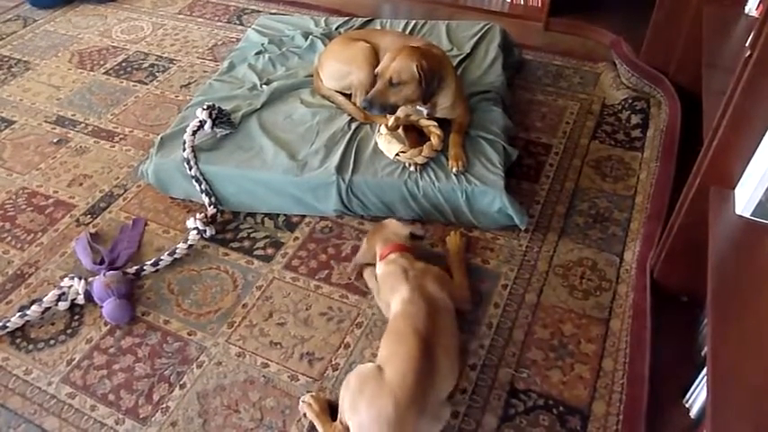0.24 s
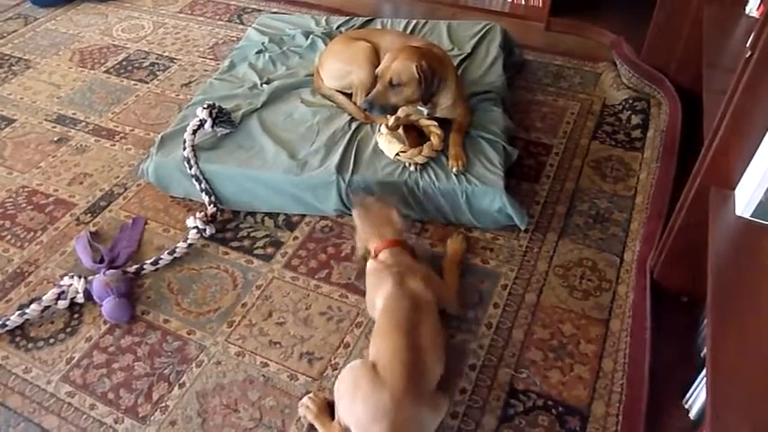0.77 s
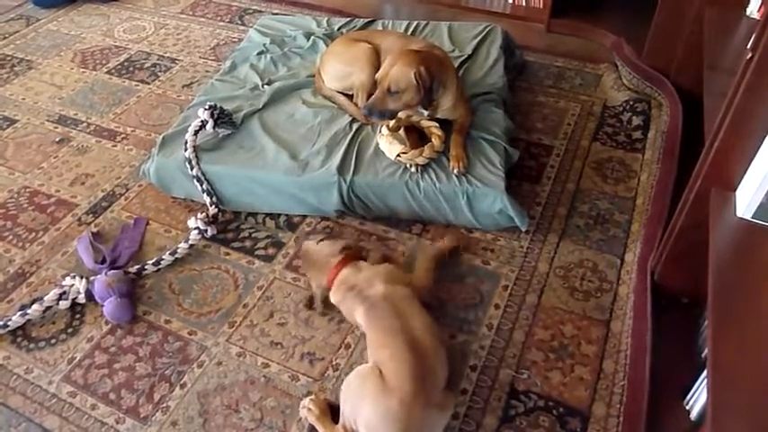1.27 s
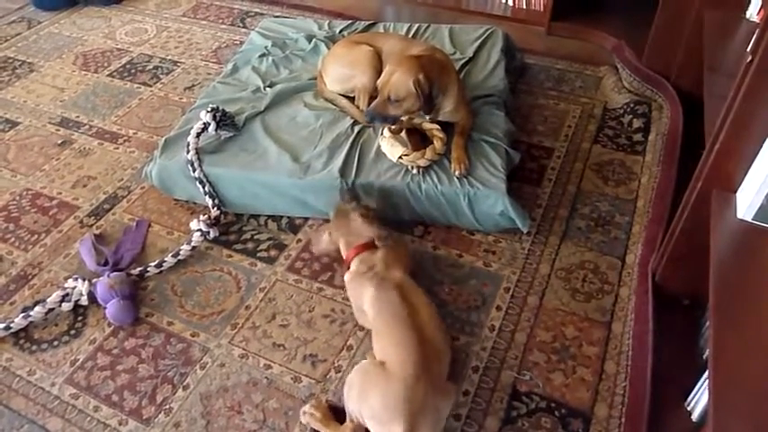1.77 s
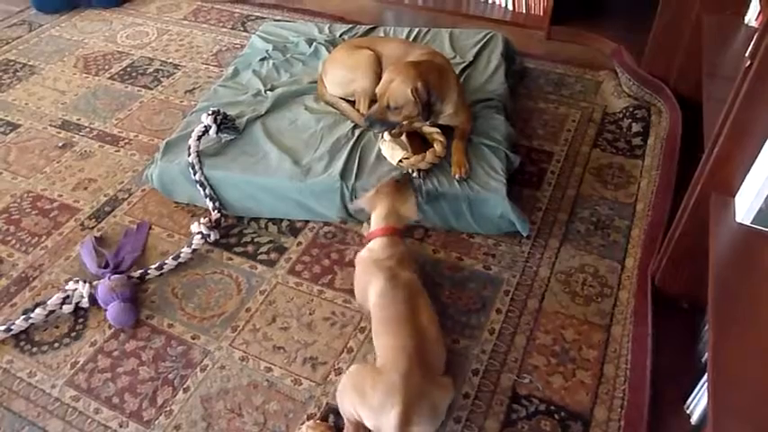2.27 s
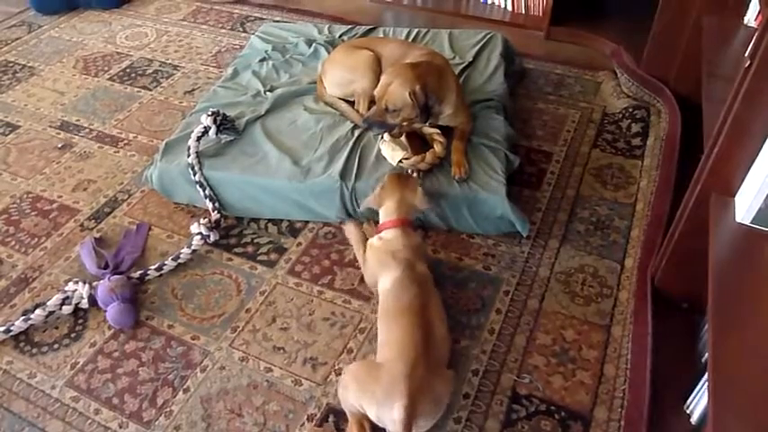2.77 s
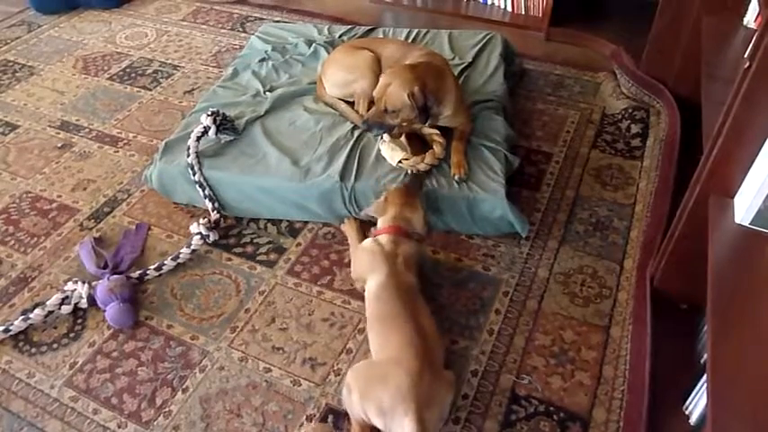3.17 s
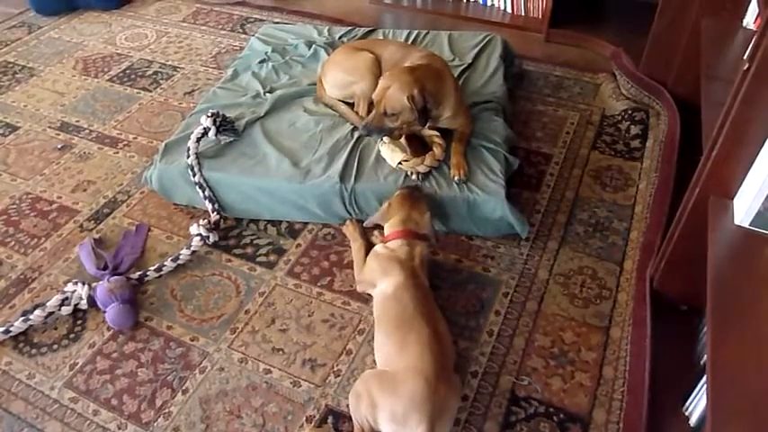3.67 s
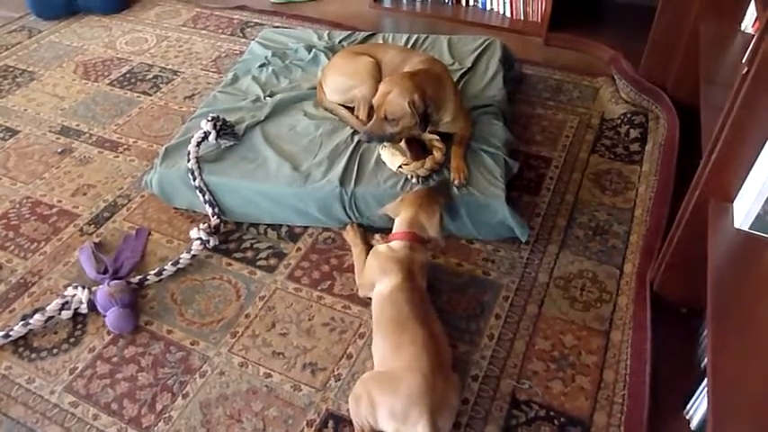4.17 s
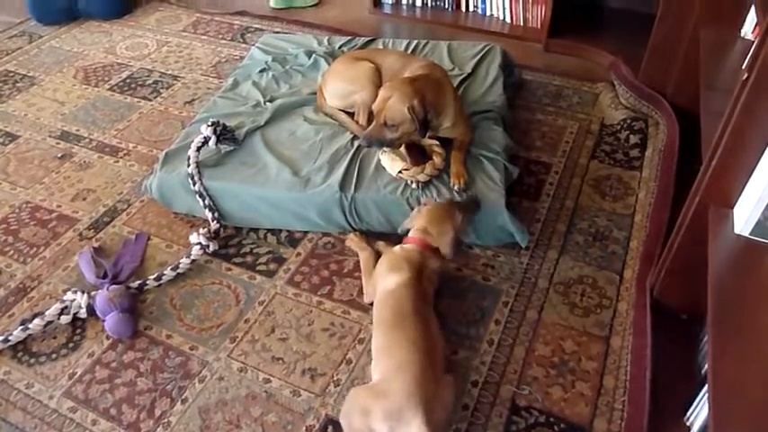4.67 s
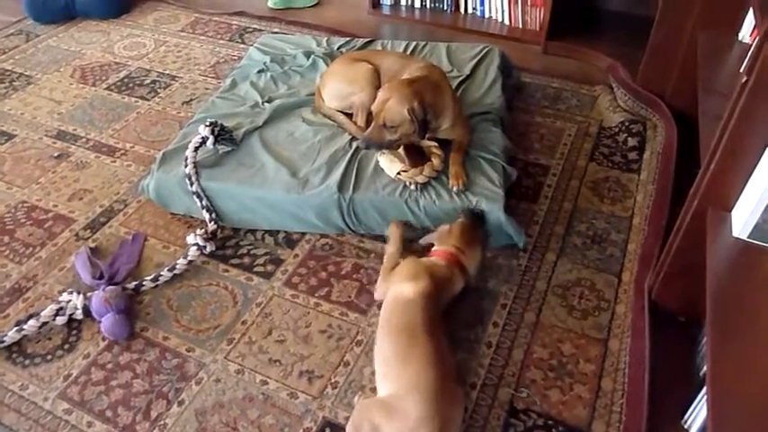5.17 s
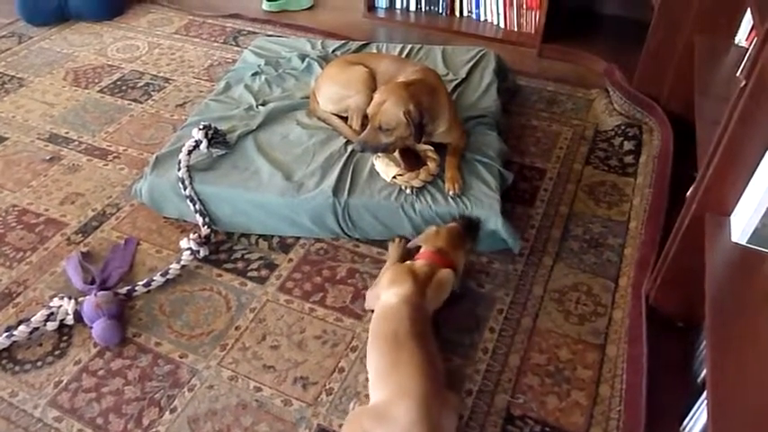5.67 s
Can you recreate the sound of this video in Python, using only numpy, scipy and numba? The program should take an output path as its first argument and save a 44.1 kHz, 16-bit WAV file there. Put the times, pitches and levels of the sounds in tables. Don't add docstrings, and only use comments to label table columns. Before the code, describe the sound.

A puppy whines and yips in short gliding bursts that crack into hoarse barks, with thin nose whistles and paw thuds in a ringing room.

```python
import sys
import numpy as np
from scipy import signal
from scipy.io import wavfile
from scipy.ndimage import uniform_filter1d
from numba import njit

SR = 44100
rng = np.random.default_rng(int(sys.argv[2]) if len(sys.argv) > 2 else 0)


def amplitude_ratio(level_db):
    exponent = np.asarray(level_db, float) / 20
    return 10 ** exponent


def pcm_store(signal):
    levels = np.round(np.clip(np.atleast_2d(signal), -1, 1) * 32767)
    wavfile.write(sys.argv[1], SR, levels.astype(np.int16).T)


N = 261406
T = np.arange(N) / SR

# time_s, pitch_hz, level_db, jaw_opening (0-1), effort (0-1)
WHINES = [
    [(0.262, 651.2, -33.5, 0.66, 0.2), (0.284, 705, -16, 0.4, 0), (0.334, 659.8, -13.5, 0.41, 0.89),
     (0.434, 614.1, -13, 0.6, 0.71), (0.52, 600.8, -14, 0.83, 0.92), (0.58, 858.4, -8, 0.28, 0.45),
     (0.624, 984, -9.5, 0.52, 0.88), (0.668, 998.8, -8, 0.48, .4)],
    [(1.118, 631.4, -15.5, 0.75, 0), (1.144, 718.7, -7.5, 1, .4), (1.186, 806.3, -6, 0.63, 0.22),
     (1.215, 810, -6, 0.4, .1)],
    [(1.465, 826, -14, .6, 1), (1.478, 868, -7.5, 0.7, 0.07), (1.5, 883.6, -9.5, .6, 0.8)],
]
PLEA = [
    [(5.045, 882.5, -54, 0.06, 0.2), (5.063, 846, -18, 0.6, 0.69), (5.101, 767.3, -14, 0.4, 0.38),
     (5.177, 739.4, -20.5, 0.5, 0.4), (5.205, 667, -17, .2, 0.3)],
    [(5.365, 505, -26, 1, 1), (5.401, 449, -22.5, 0.22, 0.97), (5.491, 441.9, -22, 0.33, 0.95),
     (5.549, 445.4, -23, 0.4, .8), (5.58, 502, -24.5, 0.8, 0.82)],
    [(5.58, 552.3, -22.5, 0, 0.82), (5.644, 780, -16.5, .8, 0.5), (5.682, 670, -18, 0.3, 0.8),
     (5.716, 611, -24, 0, 0.57), (5.736, 540.5, -23, 0.84, 0.26), (5.8, 502, -42.5, 0.8, 0.95)],
]
BARKS = [
    [(0.655, 590, -15, 0.3, 1), (0.69, 568.7, -19, 0.8, 1), (0.722, 562, -16, 0.5, 0.9),
     (0.74, 539.8, -17, 0.1, 0.7), (0.775, 525.4, -25.5, .1, 0.5)],
    [(1.37, 485.2, -28.5, .2, 0), (1.423, 631.3, -17.5, 0, 0), (1.47, 644, -16, 0.7, .8),
     (1.478, 484, -23.5, 1, 0.6), (1.52, 476.1, -18.5, .5, .7), (1.585, 471.3, -23, 0.7, .6)],
    [(1.935, 455.5, -4.5, 0.9, 1), (1.965, 484.6, -20, 0, 0.5), (2.0, 475.1, -18.5, 0, 0.9),
     (2.05, 493.7, -21.5, .1, 0.5)],
    [(3.168, 513.2, -16.5, 1, 1), (3.19, 523.2, -13.5, 1, 0.9), (3.23, 533, -17.5, 0.3, 0.4),
     (3.245, 413, -25.5, .3, 0.6), (3.32, 429.2, -25, 0, 0.1)],
    [(4.7, 462.6, -28.5, .2, 0.9), (4.74, 479.4, -34, .1, .1), (4.8, 475, -51, 0.6, 0.9)],
]
WHIMPERS = [
    [(1.212, 641.5, -24, 0.9, 0.2), (1.232, 547.3, -27, 0.14, 0.5), (1.286, 428, -24.5, 0.7, 0.15),
     (1.356, 465.5, -29.5, 1, 0.1), (1.385, 497, -8.5, 0.65, 0)],
    [(4.645, 929, -22.5, 0.45, 0.5), (4.662, 776, -26.5, .5, 0.4), (4.67, 704, -15.5, 0.24, 0),
     (4.681, 578.6, -20, 0, 0), (4.699, 468.3, -19, 0.6, 0), (4.715, 476.6, -57, 0.5, .4)],
    [(5.195, 692.5, -31, .15, 0), (5.261, 670, -17.5, .1, 0.44), (5.339, 565.5, -20, 0.04, .6),
     (5.351, 511, -28, .3, 0.1), (5.375, 501, -20.5, .5, 1)],
]
# start_s, length_s, start_pitch_hz, level_db, effort (0-1)
YIPS = [
    (1.906, .04, 968, -7, 0.61),
    (3.144, .032, 1100, -8, .6),
    (4.624, 0.032, 971, -25.5, 0.4),
]
YIP_SAG_HZ_S, YIP_ATTACK_S, YIP_START_DB, YIP_END_DB, YIP_JAW = 2930, 0.0067, -10.5, 1.5, 0.45

# pitch_hz, gain_db
CLEAR_THROAT = [(430, -5), (620, -2), (900, -2.5), (1250, 2), (1550, -5), (1900, -10), (2550, -5.5),
                (3200, -19)]
# pitch_hz, gain_db
BROKEN_THROAT = [(430, -22.5), (620, -24), (900, 2), (1200, -9.5), (1500, 1), (1900, -18.5)]
# pitch_hz, gain_db
UPPER_THROAT = [(1700, -10), (2300, -3.5), (2900, -5.5), (3600, -8.5), (3950, -40), (4300, -71.5)]
# pitch_hz, gain_db
HISSY_PARTIALS = [(4200, -29.5), (4600, -12), (5800, -17), (7500, -19), (14000, -25)]
# centre_hz, width_hz, level_db
MOUTH = [(548, 130, -11.5), (941, 386, 6), (1488, 242, 1), (2400, 750, 0.5), (3364, 260, -11)]
# shut_hz, open_hz, width_hz, gain_db (a nasal dip or a mouth peak)
CLEAR = dict(throat=CLEAR_THROAT, jaw_moves=(1193, 2194.5, 215, -15.5), soft_db=-20.5, upper_db=-6,
             hiss_db=-52.5, rasp_db=-35, jitter=.0035, shimmer_db=1.3,
             hiss_hz=5400, hiss_width_hz=2200, air_db=-3, fade_s=.006)
HOARSE = dict(throat=CLEAR_THROAT, jaw_moves=(1200.5, 2199, 216.5, -15), soft_db=-9.5, upper_db=-2,
              hiss_db=-49, rasp_db=-27.5, jitter=.015, shimmer_db=2.2,
              hiss_hz=5300, hiss_width_hz=2000, air_db=0, fade_s=.008)
BROKEN = dict(throat=BROKEN_THROAT, jaw_moves=(1400, 2500, 230, 8.1), soft_db=-12, upper_db=-3.0,
              hiss_db=-50.5, rasp_db=-7.5, jitter=.02, shimmer_db=1.4,
              hiss_hz=6800, hiss_width_hz=4000, air_db=1, fade_s=.014)
SHARP = dict(throat=[(850, 0), (1100, 2.5), (1850, -13), (2150, -4), (2800, -5.5), (3250, -18.5)],
             jaw_moves=(1194, 2198, 222, -3.0), soft_db=-12.5, upper_db=-10,
             hiss_db=-60, rasp_db=-31, jitter=.004, shimmer_db=1.6,
             hiss_hz=6000, hiss_width_hz=3000, air_db=3.0, fade_s=.006)
HISS_FOLLOWS, HISS_OPEN_DB = 0.38, 15
SOFT_RASP_DB = 3.5
JAW_RASP_DB, JAW_RASP_WIDTH_HZ = -14, 150
NOTCH_HZ, NOTCH_WIDTH_HZ = 4150, 1300

# start_s, rise_s, fall_s, level_db, pitch_hz
WHISTLES = [
    (0.0, 0.0032, 0.14, -60.5, 5930),
    (0.255, .012, .05, -38, 6350),
    (3.036, 0.062, .054, -43, 6690),
    (3.644, 0.079, 0.14, -37, 6310),
    (4.387, .008, 0.083, -29.5, 6900),
    (4.566, 0.013, .05, -37, 6620),
    (4.706, .02, 0.083, -36, 6800),
    (5.023, 0.0048, 0.13, -33, 6580),
    (5.191, 0.034, 0.046, -41, 6295),
    (5.79, 0.015, 0.12, -38.5, 6310),
]
WHISTLE_START_DB, WHISTLE_END_DB, WHISTLE_SAG_HZ_S = -13, -29, 287
OCTAVE_START_DB, OCTAVE_TOP_DB, OCTAVE_END_DB = -16, -34, -40
LEAK_DB, LEAK_FOLLOWS = -35.5, .3
# start_s, length_s, level_db, centre_hz, width_hz
GUSTS = [(0.243, 0.056, -47.5, 6320, 1500), (0.625, 0.084, -44, 8760, 6000), (1.394, .1, -43.5, 7500, 6000),
         (1.899, 0.084, -45.5, 8970, 6000), (3.041, 0.05, -52, 5800, 1800), (3.139, 0.077, -46, 8200, 4970),
         (4.383, .055, -45, 6000, 2490), (4.643, 0.12, -43.5, 4750, 4520), (5.043, 0.069, -43, 5900, 2530),
         (5.121, .3, -50.5, 4540, 1200), (0.493, .07, -51.5, 5250, 1200)]
# start_s, peak_db, thud_hz
THUDS = [
    (0.034, -24, 601),
    (2.897, -53, 457),
    (3.252, -9, 616),
    (3.766, -21, 456),
]
# time_s, level_db
RUSTLE = [
    (2.68, -67),
    (2.728, -72.5),
    (2.866, -64),
    (2.908, -64),
    (2.946, -64.5),
    (3.06, -71),
]

ROOM_T60_S, ROOM_DAMP, ROOM_DB = 0.72, 0.26, -12.5
SHADOW_HZ, SHADOW_SHARE = 2950, 0.28
SIDE_HZ, SIDE_DB, SIDE_LOW_DB = 5000, -0.5, -18.5
# centre_hz, level_db (per Hz)
HOUSE = [(15, -41), (25, -15.5), (113, -6), (305, -9.5), (340, -12.5), (631, -15.5), (997, -23),
         (1110, -35), (1200, -21), (1490, -30.5), (1850, -24), (12500, -40.5), (15500, -45)]
HOUSE_DB = -45.5
# centre_hz, width_hz, level_db
HUM = [(58.4, 12, -52.5), (118.95, 6.8, -49.5), (171.3, 10, -56), (342.8, 4.9, -56.5)]
# start_s, deepest_s, quick_release_db, slow_release_db
DUCKS = [
    (0.556, 0.736, -19.5, -6.5),
    (1.142, 1.257, -7, -3.5),
    (1.435, 1.518, -16.5, -2.5),
    (1.907, 1.996, -13, -8),
    (3.143, 3.246, -10, -4),
]
QUICK_S, SLOW_S, REST_DB, CREEP_DB_S = 0.12, 1, 3, 0.14


def voice(calls, throat, jaw_moves, soft_db, upper_db, hiss_db, rasp_db, jitter, shimmer_db,
          hiss_hz, hiss_width_hz, air_db, fade_s):
    gate, columns = tracks(calls, fade_s)
    on = gate > 0
    hz, db, jaw, push = (c[on] for c in columns)
    size = len(hz)
    turn = np.cumsum(hz * (1 + jitter * walk(282, size))) / SR
    tense_db = 19.6 * np.clip(hz / 470 - 1, 0, 1) ** 0.56
    shut_hz, open_hz, width_hz, jaw_db = jaw_moves
    jaw_hz = shut_hz + jaw * (open_hz - shut_hz)
    shape = []
    for k in range(1, 14):
        if k < 4:
            body_db = colour(throat, k * hz)
        else:
            body_db = upper_db + colour(UPPER_THROAT, k * hz) - (k - 4) * tense_db
        muffle_db = soft_db * (1 - push) * np.log2(min(k, 4))
        shape.append(body_db + muffle_db + jaw_db / (1 + ((k * hz - jaw_hz) / width_hz) ** 2))
    total_db = 10 * np.log10(sum(amplitude_ratio(d) ** 2 for d in shape))
    hiss_db = hiss_db + HISS_FOLLOWS * db + HISS_OPEN_DB * push

    tone = np.zeros(size)
    for k, shape_db in enumerate(shape, 1):
        level_db = np.maximum(db + shape_db - total_db, hiss_db + colour(HISSY_PARTIALS, k * hz))
        flicker_db = shimmer_db * np.sqrt(k - .6) * walk(70, size)
        tone += amplitude_ratio(level_db + flicker_db) * np.sin(2 * np.pi * k * turn)

    effort = uniform_filter1d(amplitude_ratio(rasp_db + db + SOFT_RASP_DB * (1 - push)), size=SR // 30)
    puffs = rng.standard_normal(size) * (1 + 0.38 * np.cos(2 * np.pi * turn))
    rasp = sum(amplitude_ratio(d) * resonant(puffs, f, w) for f, w, d in MOUTH)
    drift = resonant(rng.standard_normal(size), JAW_RASP_WIDTH_HZ / 2, JAW_RASP_WIDTH_HZ)
    rasp += amplitude_ratio(JAW_RASP_DB + jaw_db) * drift * np.cos(2 * np.pi * np.cumsum(jaw_hz) / SR)
    rasp = signal.sosfilt(signal.butter(4, [380, 3700], "band", fs=SR, output="sos"), rasp)
    hiss = resonant(puffs, hiss_hz, hiss_width_hz) + amplitude_ratio(-12) * resonant(puffs, 10500, 5000)
    out = np.zeros(N)
    out[on] = gate[on] * (np.sqrt(2) * tone + effort * rasp + amplitude_ratio(hiss_db + air_db) * hiss)
    return out


def yips():
    calls = []
    for s, length, hz, db, push in YIPS:
        stages = (0, YIP_START_DB), (YIP_ATTACK_S, 0), (length, YIP_END_DB)
        calls.append([(s + a, hz - YIP_SAG_HZ_S * a, db + d, YIP_JAW, push) for a, d in stages])
    return calls


def whistle():
    calls = []
    for s, rise, fall, db, hz in WHISTLES:
        stages = ((0, WHISTLE_START_DB, OCTAVE_START_DB), (rise, 0, OCTAVE_TOP_DB),
                  (rise + fall, WHISTLE_END_DB, OCTAVE_END_DB))
        calls.append([(s + a, db + d, db + o, hz - WHISTLE_SAG_HZ_S * (a - rise)) for a, d, o in stages])
    gate, (db, octave_db, hz) = tracks(calls, fade_s=0.0053)
    turn = 2 * np.pi * np.cumsum(hz * (1 + .007 * walk(300))) / SR
    air = band(rng.standard_normal(N), 3800, 2800) * amplitude_ratio(LEAK_DB + LEAK_FOLLOWS * db)
    tone = amplitude_ratio(db) * np.sin(turn) + amplitude_ratio(octave_db) * np.sin(2 * turn)
    return gate * (np.sqrt(2) * amplitude_ratio(3.1 * walk(60)) * tone + air)


def gusts():
    out = np.zeros(N)
    for s, length, db, hz, width_hz in GUSTS:
        part = out[int(s * SR):][:int(1.5 * length * SR)]
        x = T[:len(part)] / length
        noise = resonant(rng.standard_normal(SR // 2), hz, width_hz)[:len(part)]
        part += amplitude_ratio(db) * np.clip(x / .12, 0, 1) * np.clip((1.5 - x) / 0.62, 0, 1) * noise
    return out * amplitude_ratio(2.5 * walk(90))


def thuds():
    out, t = np.zeros(N), T[:SR // 10]
    for s, db, hz in THUDS:
        burst = rng.standard_normal(len(t)) * t / .003 * np.exp(-t / .005)
        out[int(s * SR):][:len(t)] += amplitude_ratio(db - 8.5) * resonant(burst, hz, 0.78 * hz)
    return out


def rustle():
    gate, (db,) = tracks([RUSTLE], fade_s=.02)
    return gate * amplitude_ratio(db + 3.0 * walk(49)) * resonant(rng.standard_normal(N), 9900, 7000)


@njit
def walls(x, lags, keep, damp):
    line, soft, out = np.zeros((8, 4096)), np.zeros(8), np.zeros((2, len(x)))
    for i in range(len(x)):
        total = 0.
        for k in range(8):
            soft[k] += (1 - damp) * (keep[k] * line[k, (i - lags[k]) & 4095] - soft[k])
            total += soft[k]
            out[k % 2, i] += soft[k] * (1 - (k & 2))
        for k in range(8):
            line[k, i & 4095] = x[i] + soft[k] - total / 4
    return out


def house():
    out = np.zeros((2, N))
    for hz in 40 * 2 ** np.arange(0, 8.7, .5):
        noise = band(band(rng.standard_normal((2, N)), hz, hz / 2), hz, hz / 2)
        out += amplitude_ratio(colour(HOUSE, hz) + 2.5 * walk(8)) * noise
    out *= amplitude_ratio(HOUSE_DB) / out.std()
    out[0] += sum(amplitude_ratio(db) * resonant(rng.standard_normal(N), hz, width) for hz, width, db in HUM)
    return out


def gain():
    db = REST_DB + CREEP_DB_S * (T - 3)
    for start, low, quick_db, slow_db in DUCKS:
        after = np.maximum(T - low, 0)
        ramp = np.clip((T - start) / (low - start), 0, 1)
        db = db + ramp * (quick_db * np.exp(-after / QUICK_S) + slow_db * np.exp(-after / SLOW_S))
    return amplitude_ratio(db)


def colour(table, hz):
    table_hz, table_db = np.transpose(table)
    return np.interp(np.log(hz), np.log(table_hz), table_db)


def tracks(tables, fade_s):
    s, *columns = np.transpose([row for table in tables for row in table])
    gate = sum(np.clip(np.minimum(T - c[0][0], c[-1][0] - T) / fade_s, 0, 1) ** 2 for c in tables)
    order = np.maximum.accumulate(s)
    return np.minimum(gate, 1), [np.interp(T, order, c) for c in columns]


def band(x, hz, width_hz):
    return signal.lfilter(*signal.iirpeak(hz, hz / width_hz, fs=SR), x)


def resonant(x, hz, width_hz):
    return band(band(x, hz, width_hz), hz, width_hz) * np.sqrt(SR / width_hz / 2)


def walk(rate, size=N):
    k = int(SR / rate / 16) + 1
    x = uniform_filter1d(uniform_filter1d(rng.standard_normal(size // 16 + 2), k), k)
    return np.interp(np.arange(size) / 16, np.arange(len(x)), x / x.std())


def scene():
    throat = voice(WHINES + PLEA, **CLEAR) + voice(yips(), **SHARP)
    throat += voice(WHIMPERS, **HOARSE) + voice(BARKS, **BROKEN)
    throat -= 0.88 * band(throat, NOTCH_HZ, NOTCH_WIDTH_HZ)
    puppy = (throat + whistle() + thuds() + rustle() + gusts()) / gain()
    direct = puppy - SHADOW_SHARE * signal.lfilter(*signal.butter(1, SHADOW_HZ, "high", fs=SR), puppy)
    lags = np.array([521, 797, 1153, 1511, 1931, 2393, 2861, 3407])
    keep = amplitude_ratio(-60 * lags / SR / ROOM_T60_S)
    mid, apart = amplitude_ratio(ROOM_DB) * walls(puppy + 1e-18, lags, keep, ROOM_DAMP) + house()
    treble = signal.lfilter(*signal.butter(1, SIDE_HZ, "high", fs=SR), apart)
    side = amplitude_ratio(SIDE_DB) * treble + amplitude_ratio(SIDE_LOW_DB) * apart
    return np.array([direct + mid + side, direct + mid - side])


def band_limit(x):
    return signal.sosfilt(signal.butter(12, 15730, fs=SR, output="sos"), x)


def record(dry):
    mix = np.tanh(0.67 * dry * gain()) / 0.75
    return band_limit(mix)


dry = scene()
out = record(dry)
pcm_store(out)
```